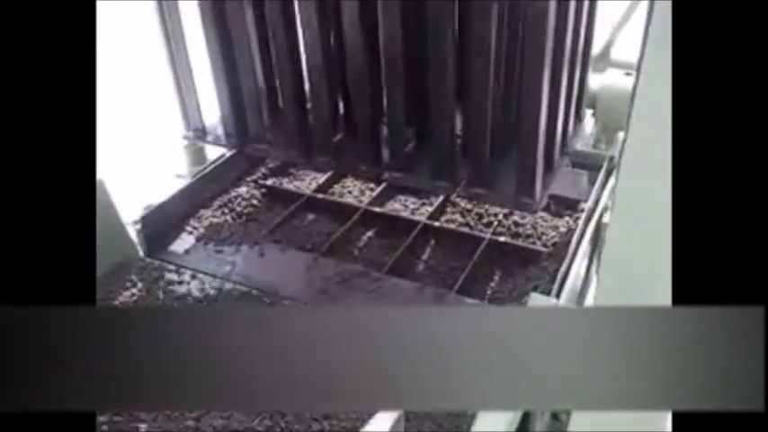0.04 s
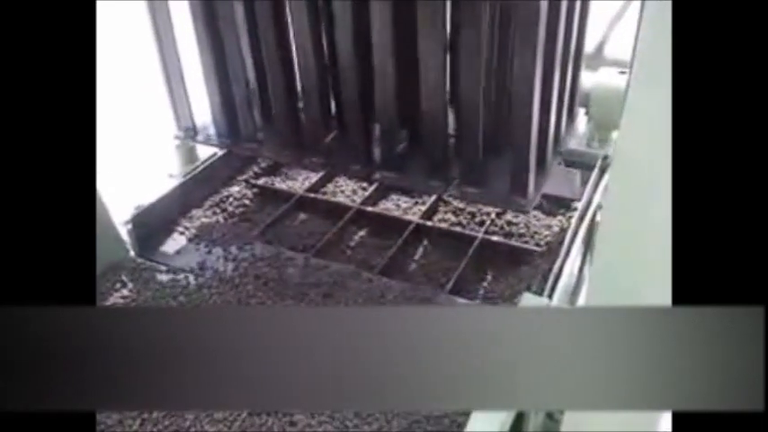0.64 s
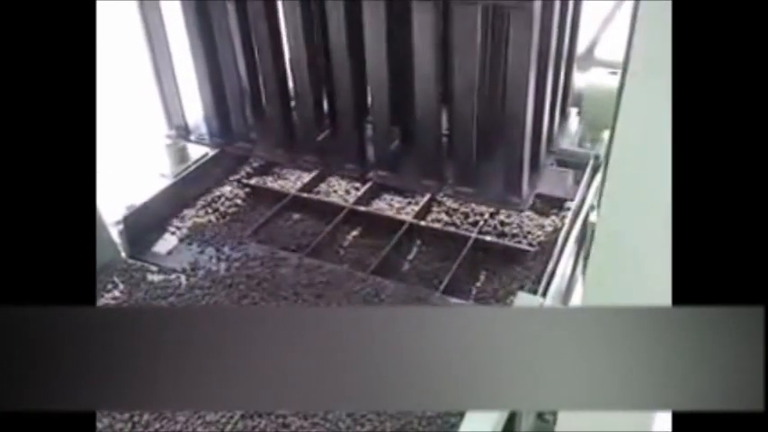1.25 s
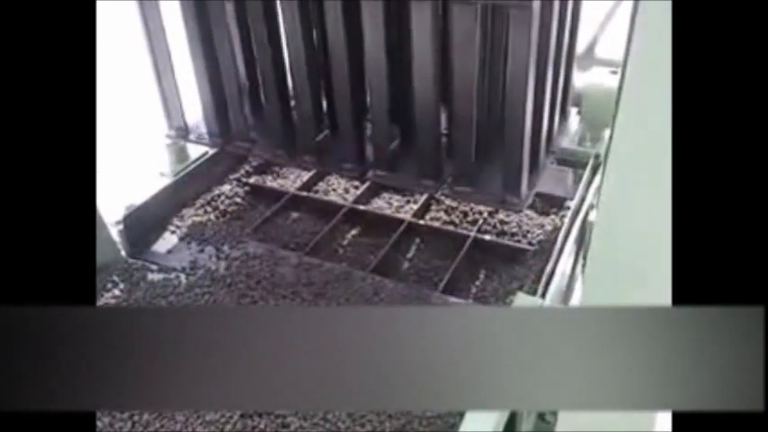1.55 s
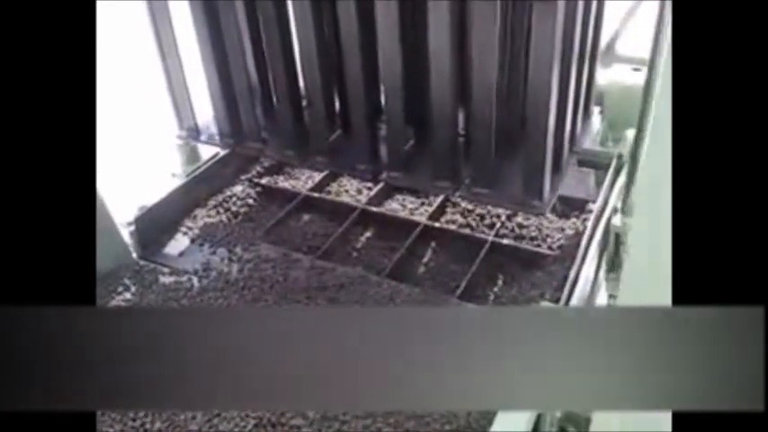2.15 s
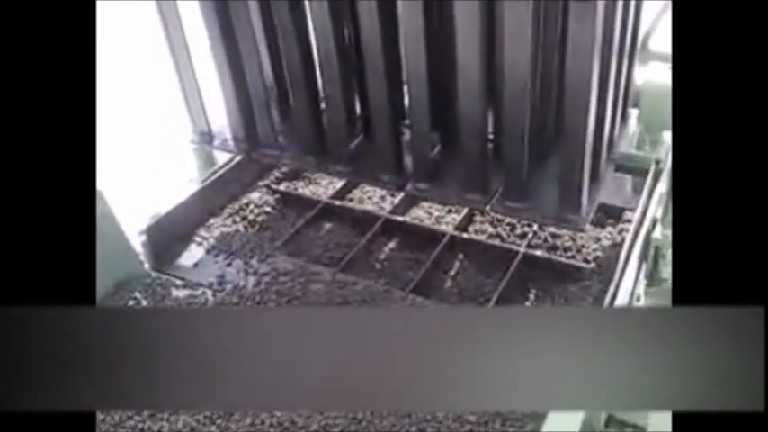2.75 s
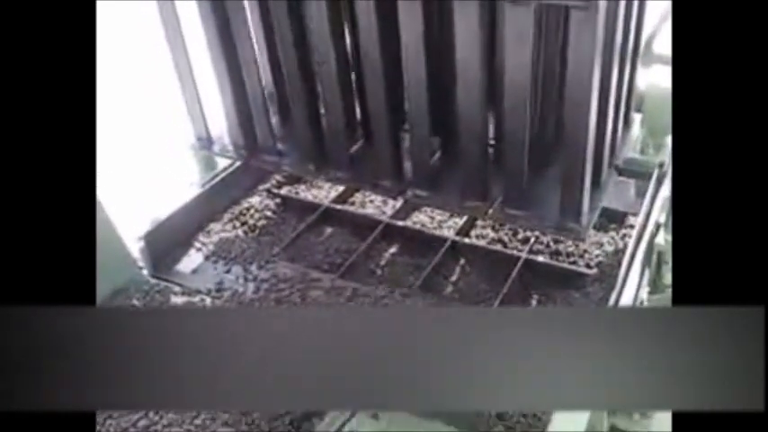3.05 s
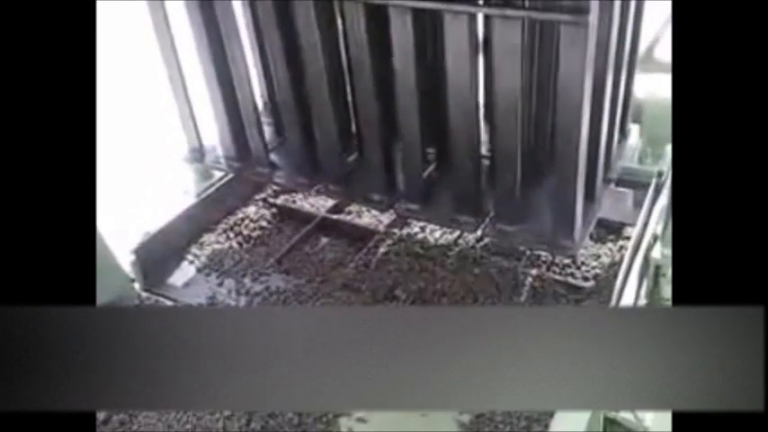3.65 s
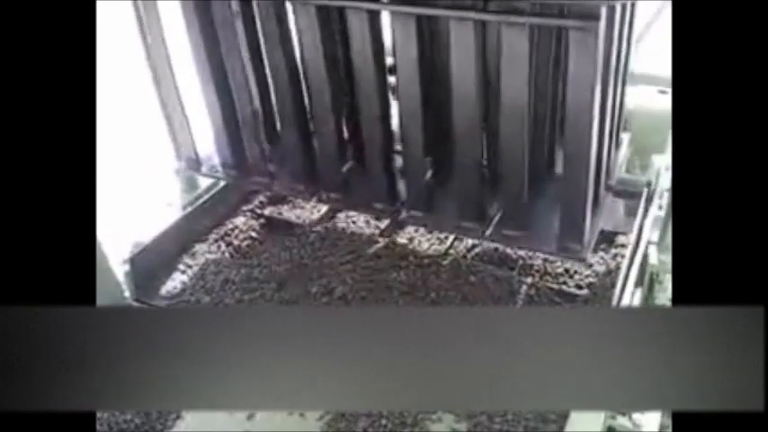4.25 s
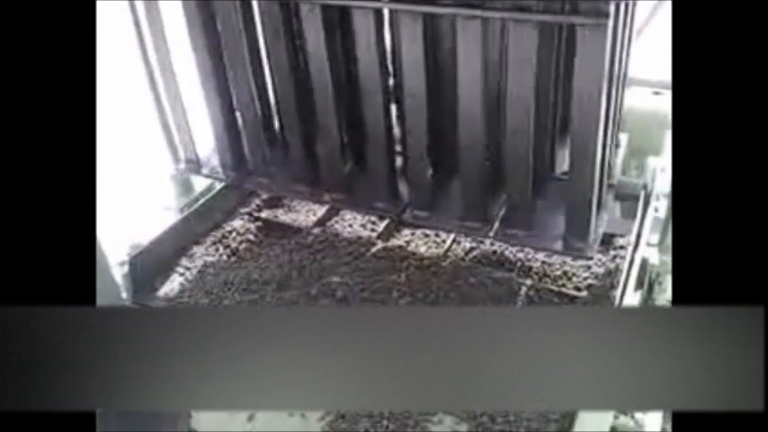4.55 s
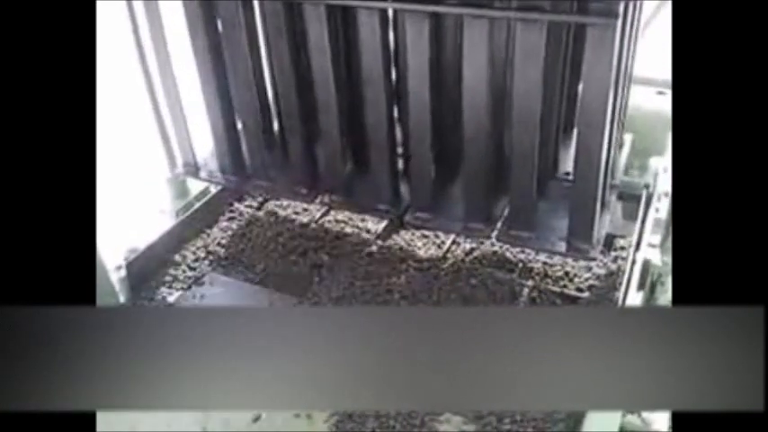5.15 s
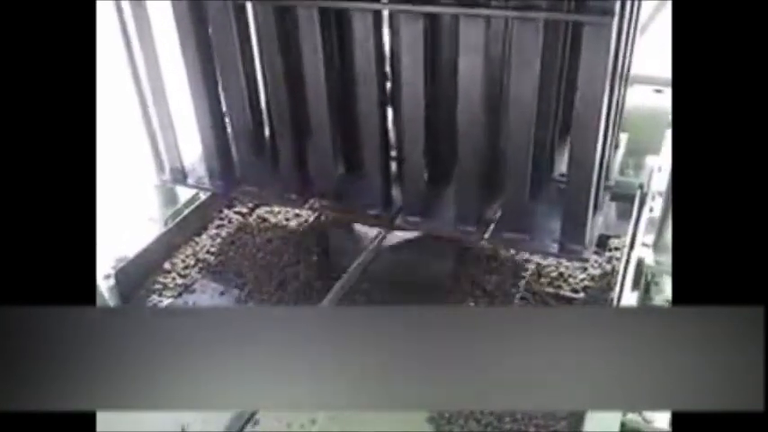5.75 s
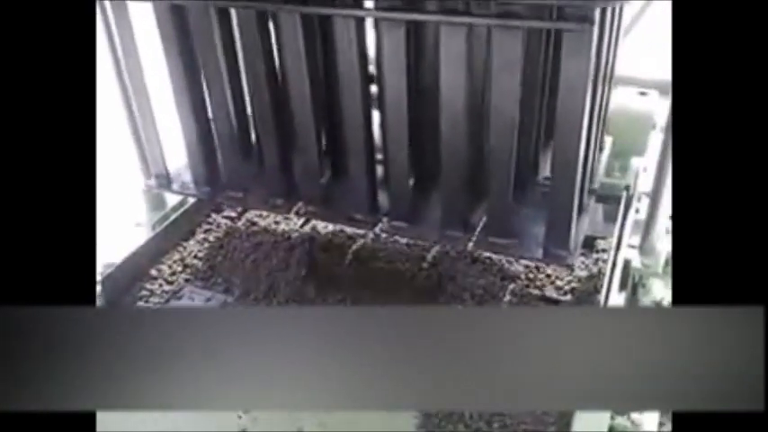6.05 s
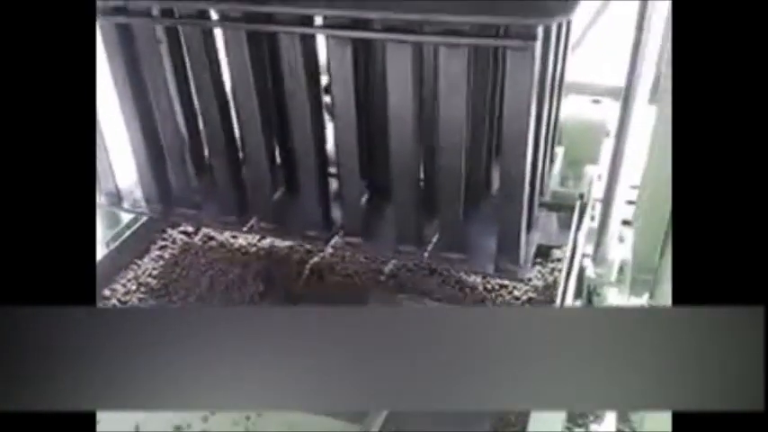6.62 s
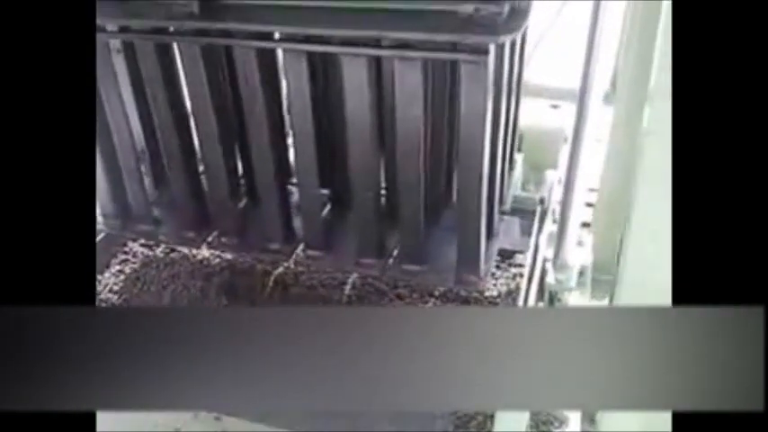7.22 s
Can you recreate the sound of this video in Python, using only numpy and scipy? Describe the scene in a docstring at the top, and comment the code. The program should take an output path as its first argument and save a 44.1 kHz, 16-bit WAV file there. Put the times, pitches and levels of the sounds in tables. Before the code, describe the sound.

A block-making machine fills its mould, with gravelly concrete rattling and cracking between heavy, ringing steel knocks.

```python
"""Concrete block machine filling its mould

Factory hall, close to the machine. Lumps of wet mix tumble in a booming steel feed box; gravel slides,
scrapes and cracks over the mould grid; steel knocks on steel and sets panels, frame and plates ringing.
One microphone into a narrow-band recorder, which overloads on the heavy knocks."""
import sys
import numpy as np
from scipy import signal
from scipy.io import wavfile

SR = 44100
rng = np.random.default_rng(int(sys.argv[2]) if len(sys.argv) > 2 else 0)


def to_wav(sig):
    """Store sig (one row per channel, or 1-D mono) as 16-bit WAV at the path in sys.argv[1].

    Samples outside -1..1 are clipped; the rate is SR.
    """
    pcm = np.clip(np.atleast_2d(sig), -1, 1) * 32767
    pcm = np.round(pcm).astype(np.int16)
    wavfile.write(sys.argv[1], SR, pcm.T)  # frames by channels


N = 325458
TIME = np.arange(N) / SR
EDGES_HZ = 28 * 2 ** (np.arange(23) / 3)   # third-octave bands
CENTRES_HZ = np.sqrt(EDGES_HZ[1:] * EDGES_HZ[:-1])
# steel on steel: start_s, contact_s, thud_hz, thud_db, clank_db, crash_db, frame_db, plate_db
STEEL_KNOCKS = [(0.000, 0.0034, 480, -3.5, -5, -2.5, -51, -33),
                (0.023, 0.034, 467, -4, -12, -9.5, -49.5, -40),
                (0.060, 0.039, 506, -10, -16, -16, -33.5, -26),
                (1.16, 0.0079, 347, -18, -20, -14, -50, -48),
                (1.214, 0.035, 271, -15, -31.5, -14, -53, -46),
                (1.575, 0.0093, 286, -15, -20, -24, -23, -44), (2.512, 0.028, 884, -5, 0, -5, -41, -5.5),
                (2.93, .02, 621, -21, -23, -24, -42, -17.5),
                (3.218, 0.0061, 702, -19.5, -32, -32.5, -43, -37),
                (3.364, 0.022, 339, -4.5, -1.5, -5, -17.5, -8.5),
                (4.173, 0.024, 425, -2.5, -1.5, -9, -27, -4),
                (4.551, 0.0075, 366, -17, -19, -17.5, -42.5, -45),
                (4.753, 0.0093, 480, -22, -12, -11, -51, -14), (5.104, 0.022, 349, -7, -4.5, -8, -26, -28),
                (5.964, 0.0022, 348, -11, -35.5, -46.5, -43, -51),
                (6.017, 0.023, 700, -35, -21.5, -17, -36, -18), (6.232, 0.013, 895, -7, -6.5, -9, -37, -31),
                (6.539, 0.024, 877, -44, -22, -32, -54, -29), (6.767, 0.022, 318.7, -2.5, -6, -9, -10, -34),
                (7.013, 0.027, 325, -35, -20, -34, -26.5, -19.5)]


def from_db(db):
    """Decibels to gain."""
    return np.exp(np.asarray(db) * (np.log(10) / 20))


def unit_rms(x):
    """Scale to unit power."""
    return x / np.sqrt(np.mean(x ** 2) + 1e-20)


def db_at(spectrum, hz):
    """Read a spectrum on a log-frequency axis."""
    points_hz, levels_db = np.transpose(spectrum)
    return np.interp(np.log(hz), np.log(points_hz), levels_db)


def band(x, index):
    """One third-octave band."""
    sos = signal.butter(2, EDGES_HZ[index:index + 2], "band", fs=SR, output="sos")
    return signal.sosfilt(sos, x + 1e-18)


def ring(x, hz, t60):
    """One damped mode: a unit click sets a sine of height 1 ringing."""
    r, w = from_db(-60 / (t60 * SR)), 2 * np.pi * hz / SR
    return signal.lfilter([0, np.sin(w)], [1, -2 * r * np.cos(w), r * r], x + 1e-18)


def flicker(rate_hz, spread_db):
    """A smooth random gain that changes about rate_hz times a second."""
    hop = 40
    r = np.exp(-2 * np.pi * rate_hz * hop / SR)
    slow = signal.lfilter([1], [1, -2 * r, r * r], rng.standard_normal(N // hop + 2002))[2000:]
    return np.repeat(from_db(spread_db * unit_rms(slow)), hop)[:N]


def grains(per_s, spread_db):
    """Random contacts, many small and a few large; rms 1."""
    clicks = np.zeros(N)
    at = np.flatnonzero(rng.random(N) < per_s / SR)
    size, sign = rng.random((2, N))[:, at]
    clicks[at] = from_db(-spread_db * np.log(size + np.exp(-3))) * np.sign(sign - .5)
    return unit_rms(clicks)


def coloured(drives, spectrum, patchy_db):
    """Two drives dealt in turn to bands that each flicker; rms 1."""
    return unit_rms(sum(band(drives[k % 2], k) * from_db(db_at(spectrum, hz)) * flicker(7.3, patchy_db)
                        for k, hz in enumerate(CENTRES_HZ)))


def knocks(rise_share, bass_lag_s, t60, bass_t60):
    """Heavy steel grinds home over crushed grit: a short dense burst whose bass swells later."""
    # spectrum of the burst: frequency_hz, level_db
    spectrum = [(35, -30.5), (70, -5), (150, -5), (320, 1.5), (600, -2.5), (1000, -4), (1600, -2),
                (2300, 1), (3000, -11), (4000, -17.5)]
    out, crush = np.zeros(N), rng.standard_normal((2, N))
    for k, hz in enumerate(CENTRES_HZ):
        bass = 1 / (1 + (hz / 600) ** 2)
        envelope = np.zeros(N)
        for start, contact, _, thud_db, clank_db, crash_db, _, _ in STEEL_KNOCKS:
            at = int(start * SR)
            t = TIME[:min(N - at, SR // 5)]
            swell = np.minimum(t / (rise_share * contact + bass * bass_lag_s), 1)
            decay_db = -60 * np.maximum(t - contact, 0) / (t60 + bass * (bass_t60 - t60))
            colour_db = db_at([(380, thud_db), (800, clank_db), (1400, clank_db), (2300, crash_db)], hz)
            envelope[at:at + len(t)] += swell * from_db(colour_db + decay_db)
        out += band(crush[k % 2], k) * envelope * from_db(db_at(spectrum, hz))
    power = np.sum(from_db(db_at(spectrum, CENTRES_HZ)) ** 2 * np.diff(EDGES_HZ))
    return out * np.sqrt(SR / 2 / power)


def panels(t60, pair_ratio, pair_db):
    """The panel that takes a knock booms briefly in two close modes."""
    out = np.zeros(N)
    for start, contact, hz, thud_db, *_ in STEEL_KNOCKS:
        at = int(start * SR)
        t = TIME[:min(N - at, SR // 4)]
        decay_db = -60 * np.maximum(t - contact, 0) / t60
        lower = np.sin(2 * np.pi * hz * t)
        upper = from_db(pair_db) * np.sin(2 * np.pi * (hz * pair_ratio * t + rng.random()))
        out[at:at + len(t)] += np.minimum(t / contact, 1) * from_db(thud_db + decay_db) * (lower + upper)
    return out


def steel_ring(modes, strengths_db, scatter_db):
    """Each knock pumps up the modes while the contact lasts, then leaves them to ring."""
    out = np.zeros(N)
    for hz, mode_db, t60 in modes:
        chance = rng.standard_normal((len(STEEL_KNOCKS), 2))
        for (start, contact, *_), strength_db, (size, phase) in zip(STEEL_KNOCKS, strengths_db, chance):
            at = int(start * SR)
            t = TIME[:min(N - at, int((t60 + contact) * SR))]
            peak_db = mode_db + strength_db + scatter_db * size
            decay_db = -60 * np.maximum(t - contact, 0) / t60
            envelope = np.minimum(t / contact, 1) * from_db(peak_db + decay_db)
            out[at:at + len(t)] += envelope * np.sin(2 * np.pi * (hz * t + phase))
    return out


def frame_and_plates():
    """The knocks ring the machine frame low and long, the mould plates high and short."""
    # modes of the frame and of the plates: pitch_hz, level_db, t60_s
    frame = [(295.3, 3.5, 0.028), (339.6, 3, 0.34), (511.6, -2.5, 0.19), (668, -16, 0.6), (687, -7, 0.37),
             (892, -5.5, 0.63)]
    plates = [(1051, -7, .12), (1206, -9, .1), (1319, -11, .12), (1394, -9, .11), (1480, -1.5, .17),
              (1612, -7, .1), (1830, -8, .12), (2005, -5, .07), (2304, -13, .12), (2745, -15, .06),
              (3375, -17, .06)]
    frame_db, plate_db = np.transpose(STEEL_KNOCKS)[-2:]
    return steel_ring(frame, frame_db, scatter_db=4.0) + steel_ring(plates, plate_db, scatter_db=2.5)


def sliding_loads(sag_db_per_s, release_db_per_s, trickle_db, drag_db):
    """Each load swells, thins as it runs and dies away; gives dB curves for gravel, scrape and boom."""
    # loads sliding into the mould: start_s, swell_s, run_s, gravel_db, scrape_db, boom_db
    loads = [(0.0, 0.022, 0.06, -31.5, -15.5, -15.5), (0.14, 0.024, .15, -35.5, -27.5, -26),
             (0.60, 0.052, .14, -26.5, -44, -34), (0.79, 0.045, 0.072, -29, -23.5, -21.5),
             (0.95, .13, 0.038, -23, -23.5, -19.5), (1.162, 0.039, .06, -23, -14.5, -16),
             (1.309, .04, .10, -22, -22.5, -29), (1.57, .03, .07, -26, -24.5, -20),
             (1.749, 0.034, 0.14, -30, -37.5, -27), (1.90, 0.027, .06, -40, -38.5, -25.5),
             (1.98, .04, .15, -30, -36.5, -36), (2.311, .05, 0.03, -24, -34, -36.5),
             (2.55, 0.23, 0.12, -13.5, -22.5, -35), (2.899, 0.035, 0.013, -17.5, -20.5, -29),
             (2.981, 0.036, 0.033, -21, -35, -40.5), (3.14, .04, .02, -26, -26.5, -29.5),
             (3.409, .06, 0.047, -15, -18.5, -21.5), (3.52, 0.074, 0.15, -14.5, -25, -45),
             (3.80, 0.033, 0.065, -26.5, -30, -49), (4.249, 0.036, 0.027, -16, -23, -37),
             (4.33, 0.046, 0.23, -17.5, -28, -44), (4.811, 0.013, 0.026, -25, -48.5, -51),
             (5.06, .09, 0.15, -17, -21, -46), (5.259, 0.051, 0.043, -14.5, -20, -29),
             (5.61, 0.048, 0.14, -38.5, -36, -28), (6.012, 0.078, 0.17, -19.5, -24, -35),
             (6.239, 0.025, 0.11, -17, -33, -30.5), (6.521, 0.028, 0.038, -30, -29.5, -38),
             (6.80, 0.03, .08, -21.5, -21.5, -24.5), (6.921, .04, .10, -22.5, -21.5, -30),
             (7.24, .05, 0.033, -27.5, -31, -28.5)]
    # steady boom of the feed box: time_s, level_db
    steady_boom = [(0.0, -23), (0.57, -27.5), (1.19, -23), (1.42, -21.5), (1.85, -30), (2.1, -31),
                   (3.45, -28.5), (3.7, -33), (5.94, -27.5), (6.66, -36), (6.93, -24.5), (7.38, -36)]
    box_db = np.interp(TIME, *np.transpose(steady_boom)) - 3
    power = from_db(np.broadcast_arrays(trickle_db, drag_db, box_db)) ** 2   # goes on between loads
    for start, swell, run, *levels_db in loads:
        t = TIME - start
        sag_db = sag_db_per_s * np.clip(t - swell, 0, run)
        release_db = release_db_per_s * np.maximum(t - swell - run, 0)
        envelope = np.clip(t / swell, 0, 1) * from_db(-sag_db - release_db)
        power += np.outer(from_db(levels_db), envelope) ** 2
    return 10 * np.log10(power)


def gravel(level_db, per_s, spread_db, cycles, clump_db):
    """Each pebble rings briefly at its own pitch; a stronger flow has more pebbles and clumps less."""
    # spectrum of sliding gravel: frequency_hz, level_db
    spectrum = [(900, -18.5), (1400, 0), (1900, -0.5), (2350, 5.5), (2750, -12), (3200, -1), (3700, -20.5),
                (4200, -30.5)]
    flow = from_db(.6 * (level_db - level_db.max()))
    clumps = flicker(45, clump_db) ** (1.4 - flow)
    clicks = grains(per_s * flow, spread_db) / np.sqrt(flow) * clumps
    pitches_hz = np.geomspace(1150, 3800, 20)
    dealt = rng.integers(0, len(pitches_hz), N)
    rings = sum(ring(clicks * (dealt == k), hz, cycles / hz) * hz * from_db(db_at(spectrum, hz))
                for k, hz in enumerate(pitches_hz))
    rattle = signal.sosfilt(signal.butter(2, 1100, "high", fs=SR, output="sos"), rings)
    return from_db(level_db) * unit_rms(rattle)


def scrape(level_db, per_s, spread_db):
    """Wet mix grinds over the mould, dull and gritty."""
    # spectrum of the scraping: frequency_hz, level_db
    spectrum = [(60, -21), (150, -7.5), (300, -10.5), (520, 0.5), (800, 2.5), (1100, -4), (1500, -1.5),
                (2200, -2), (4000, -41)]
    grit = [grains(per_s, spread_db), grains(per_s, spread_db)]
    return from_db(level_db) * coloured(grit, spectrum, patchy_db=7.0)


def pings(level_db, low_hz, high_hz, per_s, t60, spread_db):
    """Larger pebbles bounce off the steel walls, each waking one short-lived mode."""
    out, t = np.zeros(N), TIME[:SR // 12]
    fade = from_db(-60 * t / t60) * np.minimum(t / .001, 1)
    for when, pitch, size, phase in rng.random((int(per_s * N / SR), 4)):
        at = int(when * N)
        hz = low_hz * (high_hz / low_hz) ** pitch
        ping = from_db(spread_db * size) * fade * np.sin(2 * np.pi * (hz * t + phase))
        out[at:at + len(t)] += ping[:N - at]
    return from_db(level_db) * unit_rms(out)


def feed_box(level_db, ring_db, rumble_db, load_db):
    """Soft lumps drum on the hollow steel box; while it is full, its lowest modes are hit harder."""
    # hollow resonances of the box: pitch_hz, level_db, t60_s
    modes = [(266.3, -14.5, 0.77), (289.8, -3, 0.23), (327.7, -1.5, 0.14), (360.5, 0, 0.2), (411, 0, 0.095),
             (475.4, -6, 0.15), (577.4, -12.5, 0.043), (799, -19.5, 0.099), (978, -9, 0.11),
             (1230, -16.5, 0.34), (2214, -2.5, 0.025)]
    # spectrum of its rumble: frequency_hz, level_db
    spectrum = [(30, -27.5), (60, -13.5), (120, -3), (200, -3), (300, 13), (480, 9), (800, 1.5),
                (2000, -38.5)]
    lumps = grains(per_s=6000, spread_db=2.9)
    dealt = rng.integers(0, len(modes), N)
    full = np.interp(TIME, [.3, .8, 2.1, 2.6], [-1, 0.95, 0.97, -0.058])   # loaded, then partly emptied
    deep, shallow = from_db(load_db * full), from_db(-.5 * load_db * full)
    boom = np.zeros(N)
    for k, (hz, mode_db, t60) in enumerate(modes):
        blows = lumps * (dealt == k) * (deep if hz < 310 else shallow)
        boom += from_db(mode_db) * ring(blows, hz, t60)
    rumble = coloured([grains(900, 2.2), grains(760, 3.8)], spectrum, patchy_db=2.5)
    return from_db(level_db) * (from_db(ring_db) * unit_rms(boom) + from_db(rumble_db) * rumble)


def stones(snap_t60, crumb_db, body_db, edge_db, grid_db, grid_t60):
    """A stone gives a dry snap, then a dying spray of splinters; heavy ones ring the grid bars most."""
    # the loudest stones that snap or strike the grid: start_s, level_db, pitch_hz, crumbling_s
    cracks = [(0.063, 0, 2510, 0.025), (0.173, -6.5, 2250, 0.015), (0.211, -8, 2600, 0.0043),
              (0.296, -10.5, 2480, .008), (0.846, -8, 1950, 0.0061), (0.975, -10, 2460, 0.02),
              (1.089, -7, 2470, 0.013), (1.218, -2, 2480, 0.018), (1.309, -4.5, 2400, 0.013),
              (1.35, 0, 2420, 0.011), (1.376, -6, 2400, 0.0058), (1.403, -4, 2260, 0.011),
              (1.436, -3, 2330, 0.0081), (1.488, -6.5, 2140, 0.0069), (1.521, -4, 2180, 0.005),
              (1.62, 0.5, 2480, 0.0097), (1.8, -8.5, 2490, 0.0075), (1.871, -11.5, 2450, 0.015),
              (1.917, -4.5, 2180, 0.0063), (2.102, -3, 2660, 0.0075), (2.215, -7.5, 2480, 0.0057),
              (2.318, -8.5, 2120, 0.015), (2.371, -7.5, 2340, 0.0089), (2.392, -8.5, 2010, .005),
              (2.458, -11, 2280, 0.0093), (2.679, -8, 2360, 0.0044), (2.927, -6.5, 2630, .02),
              (3.109, -9, 2220, 0.0059), (3.178, -2, 2390, 0.0071), (3.296, -10, 2360, 0.012),
              (3.324, -9.5, 2420, 0.0096), (3.431, -2.5, 2270, 0.01), (3.491, -4, 2030, 0.014),
              (3.931, -7, 2500, .001), (3.94, -2.5, 2200, 0.0018), (3.954, -0.5, 2370, 0.00085),
              (4.028, -2.5, 2050, 0.0034), (4.268, -7.5, 1600, 0.019), (4.308, -7.5, 2180, .009),
              (4.638, -9, 2000, 0.007), (4.96, -14.5, 2190, 0.042), (5.035, -10.5, 2360, 0.012),
              (5.074, -5.5, 2550, 0.015), (5.307, -0.5, 2310, 0.0036), (5.332, -5.5, 2000, .006),
              (5.736, -11, 2360, 0.0047), (5.779, -13.5, 2480, 0.02), (6.140, -3, 2210, 0.0073),
              (6.3, -4, 2150, .011), (6.431, -7, 2300, 0.01), (6.848, -7, 2320, 0.011),
              (7.04, -3, 1940, 0.0061), (7.261, -15.5, 2160, 0.027)]
    out, splinters = np.zeros(N), grains(per_s=6000, spread_db=0.79)
    for start, level_db, hz, crumbling in cracks:
        at = int(start * SR)
        t = TIME[:min(N - at, SR // 8)]
        spray = np.exp(-t / crumbling) * np.minimum(t / 0.0017, 1)
        force = from_db(crumb_db) * splinters[at:at + len(t)] * spray
        force[0] = 1   # the snap itself
        snap = ring(force, hz, snap_t60)
        snap -= from_db(body_db) * ring(force, hz * 0.65, snap_t60)
        snap -= from_db(edge_db) * ring(force, hz * 1.5, snap_t60)
        grid = from_db(grid_db + 0.97 * level_db) * ring(force, hz * 1.02, grid_t60)
        out[at:at + len(t)] += from_db(level_db) * (snap + grid)
    return out


def echoes(x, shortest_s, longest_s, t60):
    """Parallel echo paths between walls, smeared by allpasses."""
    out = np.zeros(N)
    lags = (np.geomspace(shortest_s, longest_s, num=9) * SR).astype(int)
    for k, lag in enumerate(lags):
        loop, gain = x.copy(), from_db(-60 * lag / SR / t60)
        for i in range(lag, N, lag):
            loop[i:i + lag] += gain * loop[i - lag:i][:N - i]
        out += (loop - x) * (-1) ** k
    for lag in (67, 151):
        taps = np.r_[.6, np.zeros(lag), 1]
        out = signal.lfilter(taps, taps[::-1], out)
    return out


def hall(x):
    """Direct sound, a quick flutter between the machine's steel walls, then the hall's faint tail."""
    flutter = from_db(-17) * echoes(x, shortest_s=.0027, longest_s=.0089, t60=.045)
    tail = from_db(-29) * echoes(x, shortest_s=0.019, longest_s=0.065, t60=0.97)
    return x + flutter + tail


def room_tone():
    """The hall's background noise, wavering a little in each band."""
    # spectrum of the hall noise: frequency_hz, level_db
    spectrum = [(30, -29), (60, -11), (180, -2), (330, -4.5), (500, -6), (1000, -11), (2200, -9.5),
                (3200, -1.5), (4000, -24.5)]
    return coloured(rng.standard_normal((2, N)), spectrum, patchy_db=3.5)


def scene():
    """At the microphone: flowing mix, snapping stones and knocking steel over the room tone."""
    gravel_db, scrape_db, boom_db = sliding_loads(sag_db_per_s=11.5, release_db_per_s=117.5,
                                                  trickle_db=-40.5, drag_db=-36.5)
    far = from_db(-2.0) * gravel(gravel_db, per_s=7000, spread_db=3.5, cycles=21, clump_db=2.5)
    far += from_db(-2.5) * scrape(scrape_db, per_s=3500, spread_db=3.5)
    # a thick flow smothers the walls, so their ringing grows more slowly than the flow
    far += pings(0.61 * gravel_db - 15.5, low_hz=1705, high_hz=2875, per_s=130, t60=0.075, spread_db=8.5)
    far += pings(0.73 * scrape_db - 12.0, low_hz=480, high_hz=1600, per_s=90, t60=0.069, spread_db=10.5)
    far += from_db(2.5) * knocks(rise_share=0.12, bass_lag_s=0.0084, t60=0.11, bass_t60=0.071)
    # the mould, its grid and the feed box are closest to the microphone and arrive dry
    near = feed_box(boom_db, ring_db=-2.0, rumble_db=-7.0, load_db=3.5)
    near += stones(snap_t60=0.0042, crumb_db=-16, body_db=-7.5, edge_db=-15.5,
                   grid_db=-13, grid_t60=0.029)
    near += from_db(-0.5) * panels(t60=0.062, pair_ratio=1.12, pair_db=-4)
    near += frame_and_plates()
    return (hall(far) + near + from_db(-43) * room_tone())[None]


def record(dry):
    """A telephone-wide input with a soft top, then hard overload, whose splatter is the only treble."""
    soft = signal.sosfilt(signal.butter(4, 3650, fs=SR, output="sos"), dry)
    narrow = signal.sosfilt(signal.ellip(10, .3, 95, 3960, fs=SR, output="sos"), soft)
    clipped = np.clip(narrow, -1, 1)
    return signal.sosfilt(signal.ellip(10, .1, 80, 15500, fs=SR, output="sos"), clipped)


dry = scene()
out = record(dry)
to_wav(out)
```